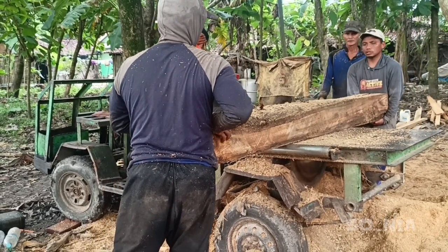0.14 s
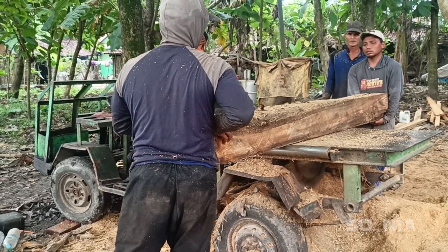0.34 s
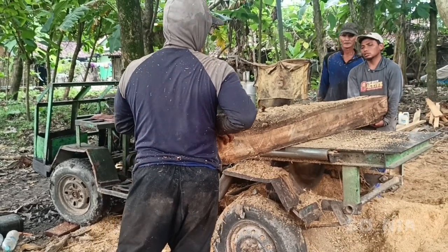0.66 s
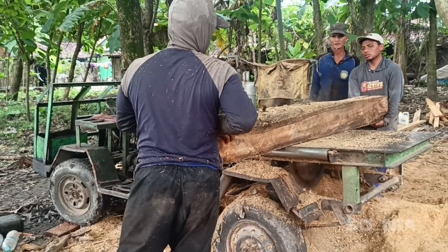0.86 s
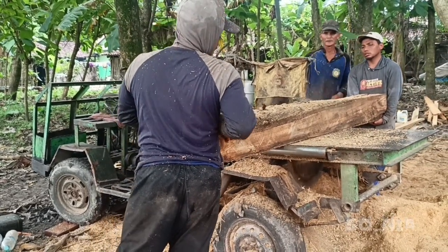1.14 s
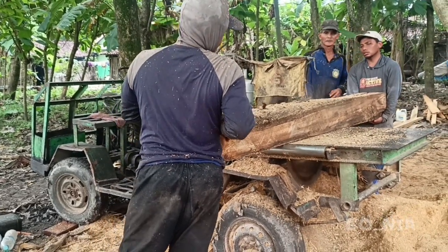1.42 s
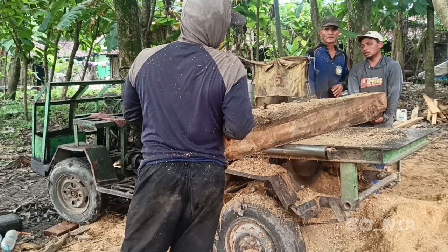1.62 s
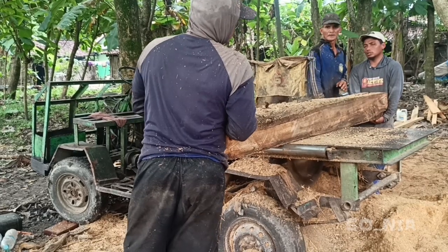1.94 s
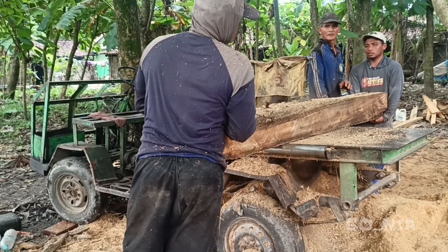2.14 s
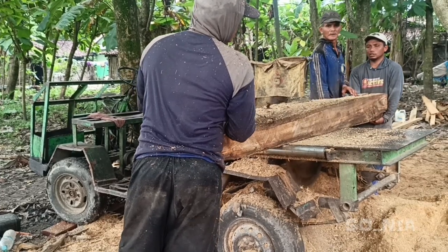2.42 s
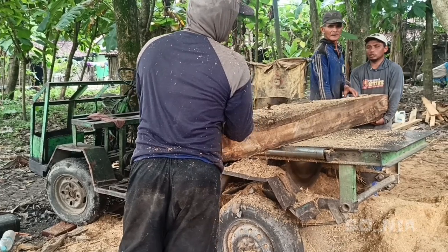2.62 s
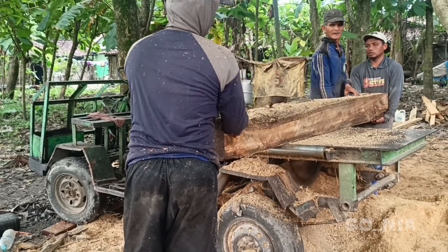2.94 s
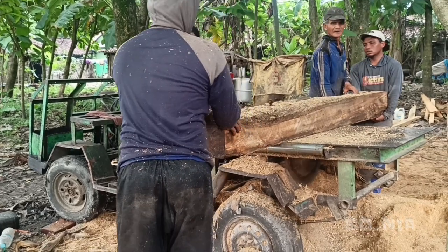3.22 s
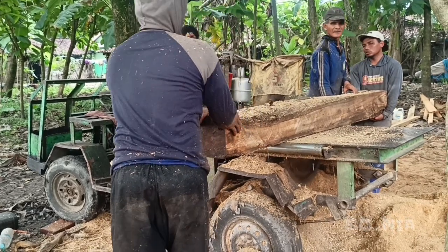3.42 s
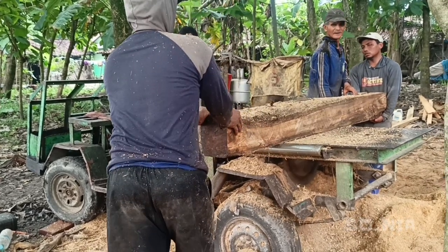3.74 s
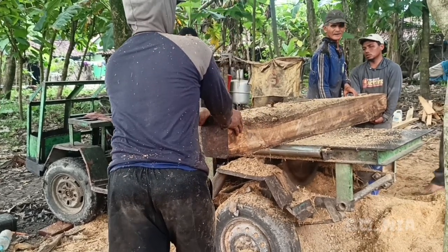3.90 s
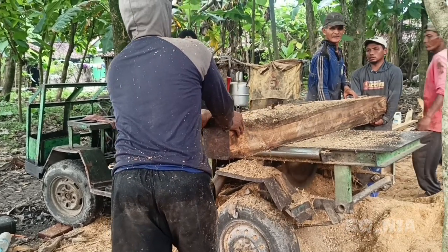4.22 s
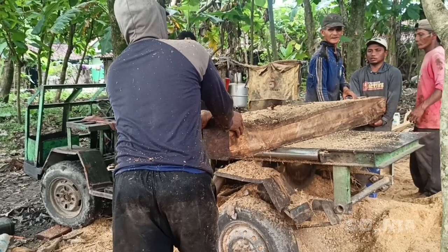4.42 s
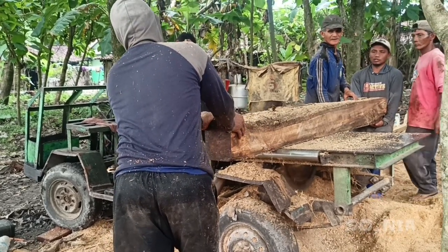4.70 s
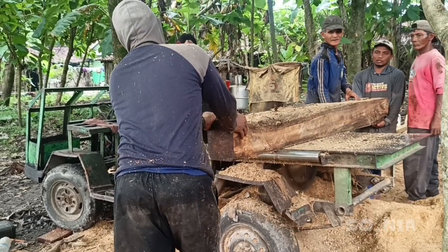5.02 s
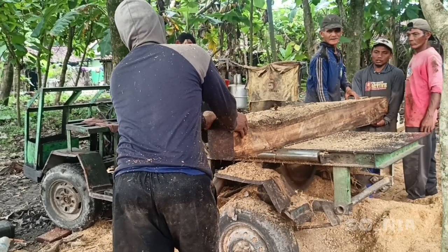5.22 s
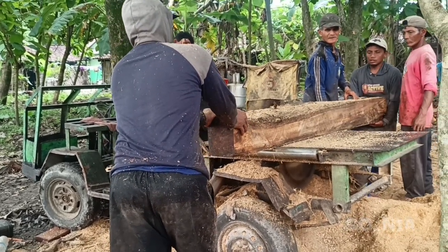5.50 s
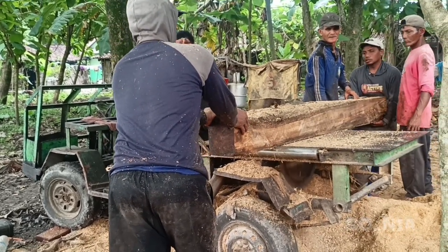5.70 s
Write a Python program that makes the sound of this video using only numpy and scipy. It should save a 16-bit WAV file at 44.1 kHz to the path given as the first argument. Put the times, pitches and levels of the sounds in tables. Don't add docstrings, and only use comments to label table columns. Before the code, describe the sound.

Outdoors, a diesel-powered saw blade tears through timber in bright, ringing surges while the engine chugs fast and loose metal rattles beneath.

```python
import sys
import numpy as np
from scipy import signal
from scipy.fft import rfft, irfft, next_fast_len
from scipy.io import wavfile
from scipy.ndimage import uniform_filter1d, map_coordinates

SR = 44100
rng = np.random.default_rng(int(sys.argv[2]) if len(sys.argv) > 2 else 0)


def generate_wav(sig):
    pcm = np.round(np.clip(np.atleast_2d(sig).T, -1, 1) * 32767).astype(np.int16)
    wavfile.write(sys.argv[1], SR, pcm)


def magnitude_from_level(level_db):
    exponent = np.asarray(level_db, float) / 20
    return 10 ** exponent


N = 258426

# time in seconds, pressure in dB,
# rise from start to end of a bite in dB, easing off between bites in dB.
FEED = [(-.068, -24.5, 2.8, -2.7), (.164, -16.5, 4, 4), (.369, -11.6, 0, 9.5), (.734, -15, -2.5, 12),
        (1.104, -19.5, -4.5, 7), (1.359, -18, -.9, 9.3), (1.619, -16, -1.5, 8), (2.113, -15.3, -0.8, 10),
        (2.471, -15.5, -1.5, 9), (2.974, -17, -.9, 8.5), (3.237, -19, -2, 6), (3.47, -13, 5.5, 7),
        (3.866, -15, -1.8, 11.5), (4.366, -16.5, -5.5, 9), (4.894, -17.2, -3.5, 10.5),
        (5.277, -15, -3, 9.6), (5.554, -18.5, -2.1, 4), (5.895, -18.1, -0.5, 9.7)]
BLADE_TURNS = [0, 2, 4, 7, 10, 12, 14, 18, 21, 25, 27, 29, 32, 36, 40, 43, 45, 48]
# frequency in Hz, level in dB.
TEARING_TONE = [(1300, -16), (2200, -19), (2970, -19), (3330, -9.5), (4030, -8), (4610, -10), (5130, -4),
                (5570, -10.5), (6160, 0), (7150, 0.5), (8510, -8.5), (11100, -18.5), (14000, -16.5),
                (15500, -12)]
# frequency in Hz, level in dB.
IDLE_TONE = [(1800, -17.5), (2400, -7.0), (4200, 2.0), (5500, -1.5),
             (7200, 2.5), (9000, -18), (11500, -16), (15500, -14.0)]
# frequency in Hz, width in Hz, lift in dB.
BLADE_RINGS = [(3280, 120, 4.5), (4140, 550, 3.5), (5180, 95, 4), (6300, 50, 2.5), (6090, 66, 2.5),
               (6670, 35, 0), (6770, 71, 0.5), (7140, 40, 1.5), (7240, 46, 5), (7430, 250, 1),
               (7500, 40, 4), (7720, 100, 4), (7900, 55, 2.5), (9300, 300, 2), (9360, 200, 2.5),
               (10400, 170, 2), (13600, 500, 1)]
# time in seconds, peak level in dB.
SPLINTERS = [(0.188, -8), (0.3822, -11), (0.4785, -7), (0.6037, -4), (0.865, -11), (0.9908, -11),
             (1.3686, -9.5), (3.2486, -13), (4.003, -10), (4.2499, -8), (4.376, 1.5), (4.575, -8),
             (5.0336, -9), (5.29, -5), (5.4088, -6)]

# time in seconds, engine cycles done.
ENGINE_CYCLES = [(0, -1.076), (0.1078, 0.0), (0.4106, 3.0), (0.7246, 6.0), (1.0422, 9.0), (1.6728, 15.0),
                 (2.3, 21.0), (2.615, 24.0), (2.9318, 27.0), (3.5606, 33.0), (3.8765, 36.0), (4.5156, 42.0),
                 (4.8324, 45.0), (5.4677, 51.0), (5.86, 54.733)]
# time in seconds, throttle in dB, load on the piston in dB.
ENGINE_EFFORT = [(.06, 3, -30.5), (.26, 5, -32), (.46, 2, -31.5), (.88, -1, -37.5), (1.31, -0.5, -36.5),
                 (1.52, 1, -31.5), (1.8, 0.5, -34.5), (2.14, 0.6, -32), (2.4, -.5, -35), (2.98, -1.5, -37),
                 (3.3, 0.2, -33.5), (3.61, .6, -33.5), (4.04, -0.5, -37), (4.46, .1, -36), (4.67, 1, -33),
                 (4.89, 1.1, -35.5), (5.6, -.2, -35.5), (5.86, 2.6, -26)]
# share of the cycle, ring in Hz, time to fade 60 dB in seconds, level in dB.
GAS_PUFFS = [(.008, 175, .03, -9), (.254, 255, .017, 4), (.296, 110, .045, -3), (.519, 215, .021, 6),
             (.582, 165, .04, -3), (.526, 171, .4, -16), (.76, 465, .12, -14), (.91, 175, .022, 2),
             (.978, 82, .1, -2), (.2, 286, .3, -21)]
# frequency in Hz, level in dB.
PIPE_TONE = [(30, -30), (52, 5.5), (75, -.3), (350, -1.3), (700, -3.5), (2000, -40)]
# frequency in Hz, level in dB.
BARK_TONE = [(60, -40), (95, 1.5), (150, -12), (220, -8), (300, 3), (400, -12), (900, -40)]
# share of the cycle, level in dB.
BLOWS = [
    (.705, 0),
    (.775, -9),
    (.835, -9),
    (.895, -8),
    (.982, -9),
]
# frequency in Hz, level in dB, time to fade 60 dB in seconds.
BLOCK_RINGS = [(680, -2, .05), (790, -1, .06), (850, -3, .05), (950, -3, .04), (1270, -5, .05),
               (1420, -6, .04)]
# share of the cycle, time to fade 60 dB in seconds, level in dB.
VALVE_TAP = (.78, 0.06, -14.5)
# frequency in Hz, level in dB.
COVER_TONE = [(1900, -44), (2350, -9), (2520, 2), (2750, -6), (3300, -40)]
# frequency in Hz, level in dB.
RATTLE_TONE = [(250, -47), (400, -10), (570, -12), (940, -8.5), (1060, -13), (1500, -10.5), (2150, -17.5),
               (2950, -18.5), (4300, -62)]
# frequency in Hz, width in Hz, lift in dB.
PANEL_RINGS = [(452.5, 30, 6.5), (650, 29, 9), (726, 41, 4), (870, 30, 3), (1284, 33, 7), (1425, 80, 5),
               (1768, 85, 4.5), (2500, 260, 9.5)]
# frequency in Hz, level in dB.
RUMBLE_TONE = [(30, -55), (60, -8), (100, -7), (180, 0), (290, 3), (380, -4), (600, -13.5), (1200, -46)]


def unit(x):
    return x / np.sqrt(np.mean(x ** 2) + 1e-20)


def clock():
    return np.arange(N) / SR


def noise():
    return rng.standard_normal(N)


def wobble(rate):
    points = rng.standard_normal(int(N * rate / SR) + 4)
    return map_coordinates(points, [clock() * rate])


def coloured(x, tone, rings=()):
    size = next_fast_len(N + 8192)
    hz = np.fft.rfftfreq(size, 1 / SR)
    tone_hz, tone_db = np.transpose(tone)
    gain_db = np.interp(np.log(hz + 1), np.log(tone_hz + 1), tone_db)
    for centre, width, lift_db in rings:
        gain_db += lift_db / (1 + (2 * (hz - centre) / width) ** 2)
    return unit(irfft(rfft(x, size) * magnitude_from_level(gain_db), size)[:N])


def patchy(x, patchy_db):
    spectrum = signal.stft(x, nperseg=256)[2]
    field = rng.standard_normal(spectrum.shape)
    field = uniform_filter1d(field, size=4, axis=0)
    field = uniform_filter1d(field, size=8, axis=1)
    return signal.istft(spectrum * magnitude_from_level(patchy_db * unit(field)), nperseg=256)[1][:N]


def each_cycle(share, scatter_db, slip_s):
    s, done = np.transpose(ENGINE_CYCLES)
    cycle = np.arange(-3, 56)
    at = np.interp(cycle + share, np.r_[done[0] - 5, done], np.r_[-.5, s])
    chance = rng.standard_normal((len(cycle), 2))
    keep = at < s[-1]
    spot = np.round((at + .5 + slip_s * chance[:, 0]) * SR).astype(int)
    return np.bincount(spot[keep], magnitude_from_level(scatter_db * chance[keep, 1]), N + SR)


def fade(t60, seconds):
    return magnitude_from_level(-60 * np.arange(int(seconds * SR)) / SR / t60)


def after_each(blows, response):
    return signal.fftconvolve(blows, response)[SR // 2:][:N]


def rung(blows, hz, t60, attack):
    t = np.arange(SR // 4) / SR
    note = np.sin(2 * np.pi * hz * t) * (1 - np.exp(-t / attack))
    return after_each(blows, note * fade(t60, .25))


def saw():
    chips = (rng.random(N) < .12) * noise() * magnitude_from_level(2 * noise())
    tearing = 0.63 * unit(chips) + noise() * magnitude_from_level(0.62 * wobble(500))
    cut = coloured(patchy(tearing, patchy_db=1.3), TEARING_TONE, BLADE_RINGS)
    chatter_db = 0.25 * wobble(35) + 1.1 * wobble(120)
    bites = magnitude_from_level(pressure() - 1.4) * unit(magnitude_from_level(chatter_db))
    idle = coloured(noise(), IDLE_TONE, BLADE_RINGS)
    return (bites + splinters()) * cut + magnitude_from_level(-27.0) * idle


def pressure():
    entry, usual_exit = 0.1, .431
    exit_per_db = .077
    eased = 0.59
    s, press_db, lean_db, ease_db = np.transpose(FEED)
    turn = np.arange(BLADE_TURNS[-1])
    lean = np.interp(turn + .4, BLADE_TURNS, lean_db)
    ease = np.interp(turn + .9, BLADE_TURNS, ease_db)
    leave = np.clip(usual_exit - exit_per_db * lean, .3, .85)
    moments = np.stack([entry + 0 * leave, leave, leave + eased * (1 - leave)], 1)
    knots = turn[:, None] + moments
    shape_db = np.stack([-lean / 2, lean / 2, -ease], 1)
    level_db = np.interp(knots, BLADE_TURNS, press_db) + shape_db
    knot_s = np.interp(knots, BLADE_TURNS, s)
    return uniform_filter1d(np.interp(clock(), knot_s.ravel(), level_db.ravel()), size=550)


def splinters():
    snap_s, snap_db = np.transpose(SPLINTERS)
    breaks = np.bincount(np.round(snap_s * SR).astype(int), magnitude_from_level(snap_db - 16.5), N)
    return signal.fftconvolve(breaks, fade(0.053, .1))[:N]


def diesel():
    s, throttle, load = np.transpose(ENGINE_EFFORT)
    throttle_db = np.interp(clock(), s, throttle)
    load_db = np.interp(clock(), s, load)
    return exhaust(throttle_db) + knock(load_db) + loose_metal(throttle_db) + rumble(throttle_db)


def exhaust(throttle_db):
    puffs = np.zeros(N)
    for share, hz, t60, db in GAS_PUFFS:
        pulses = each_cycle(share, scatter_db=.8, slip_s=.00025)
        puffs += magnitude_from_level(db) * rung(pulses, hz, t60, attack=.0005)
    bark = magnitude_from_level(-54 + 4.5 * throttle_db) * coloured(puffs, BARK_TONE)
    return bark + magnitude_from_level(-29.5 + throttle_db) * coloured(puffs, PIPE_TONE) * magnitude_from_level(.1)


def engine_blows():
    return sum(magnitude_from_level(db) * each_cycle(share, scatter_db=1.4, slip_s=.0003) for share, db in BLOWS)


def knock(load_db):
    block = np.zeros(N)
    for hz, db, t60 in BLOCK_RINGS:
        block += magnitude_from_level(db) * rung(engine_blows(), hz, t60, attack=0.0011)
    shake = after_each(engine_blows(), fade(.1, .25))
    shaken = coloured(shake * noise(), RATTLE_TONE, PANEL_RINGS)
    return magnitude_from_level(load_db) * (magnitude_from_level(.3) * unit(block) + magnitude_from_level(-4) * shaken)


def loose_metal(throttle_db):
    rattle = coloured(noise() * magnitude_from_level(1.46 * wobble(300)), RATTLE_TONE, PANEL_RINGS)
    share, t60, valve_db = VALVE_TAP
    jar = after_each(each_cycle(share, scatter_db=0.5, slip_s=0.0014), fade(t60, .25))
    valve = magnitude_from_level(valve_db) * coloured(jar * noise(), COVER_TONE)
    return magnitude_from_level(-29 + .6 * throttle_db) * (magnitude_from_level(-.9) * rattle + valve)


def rumble(throttle_db):
    return magnitude_from_level(-31 + 0.98 * throttle_db) * coloured(noise(), RUMBLE_TONE) * magnitude_from_level(-2.5)


def scene():
    return np.tile(saw() + diesel(), (2, 1))


def band_limit(x):
    return signal.sosfilt(signal.butter(12, 16680, fs=SR, output="sos"), x)


def record(dry):
    squeezed = dry / (1 + np.abs(dry / .9) ** 5) ** (1 / 5)
    size = next_fast_len(N)
    hz = np.fft.rfftfreq(size, 1 / SR)
    low_cut = 1 / np.sqrt(1 + (41 / (hz + 1)) ** 8)
    top_cut = hz < 15470
    limited = irfft(rfft(squeezed, size) * top_cut * low_cut, size)[:, :N]
    return band_limit(limited)


dry = scene()
out = record(dry)
generate_wav(out)
```